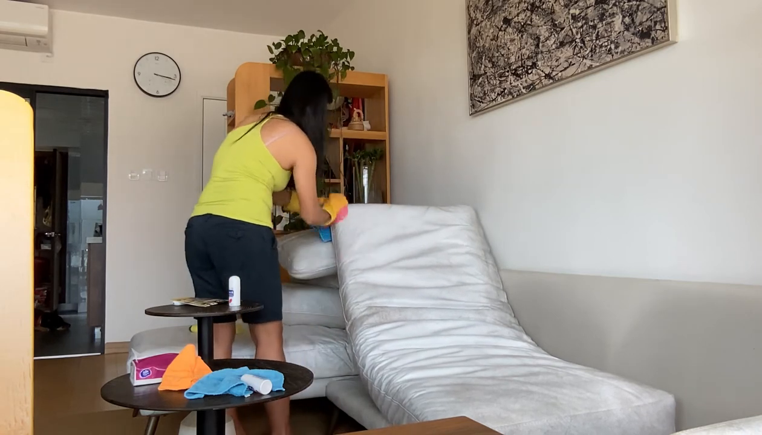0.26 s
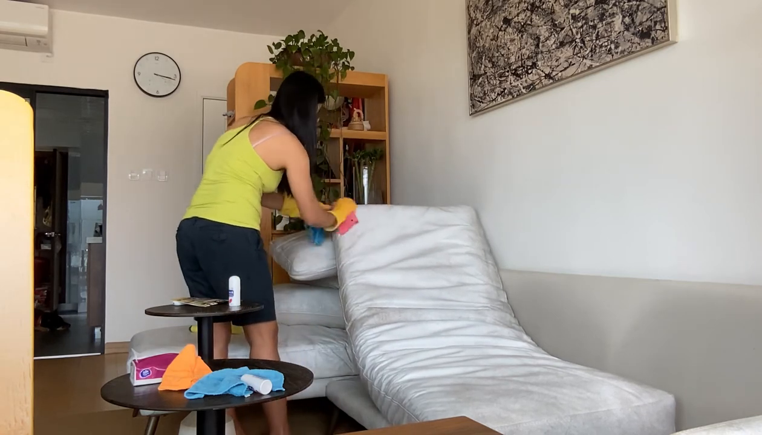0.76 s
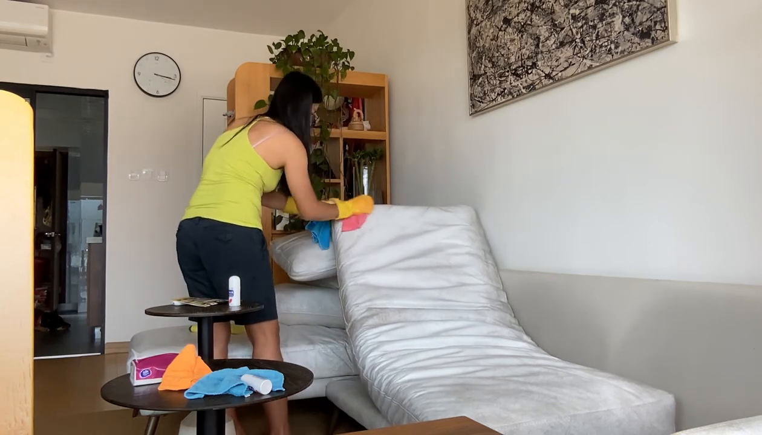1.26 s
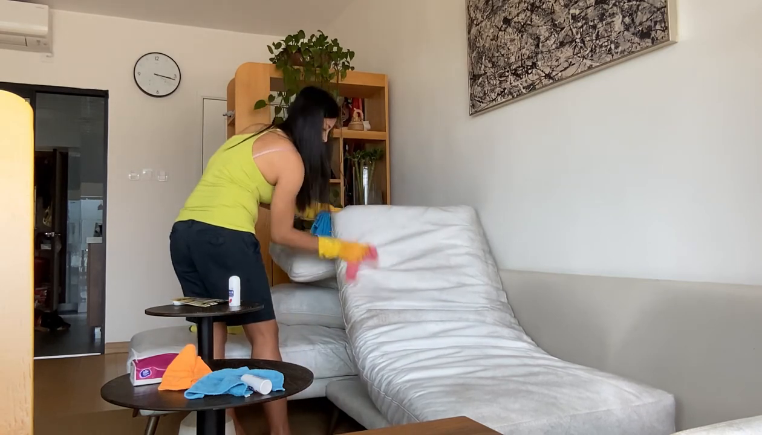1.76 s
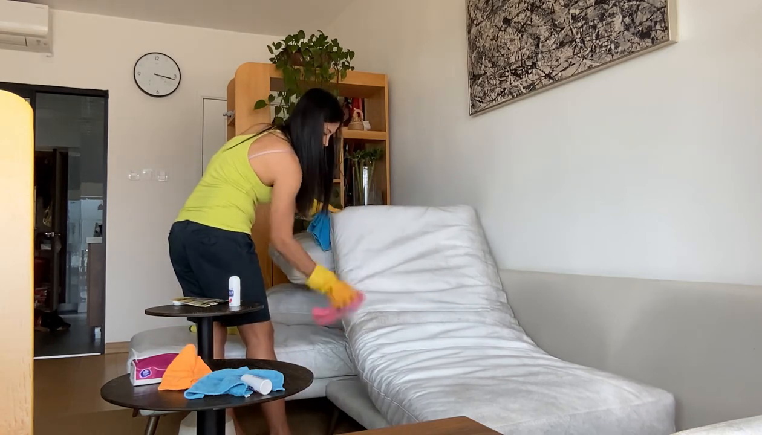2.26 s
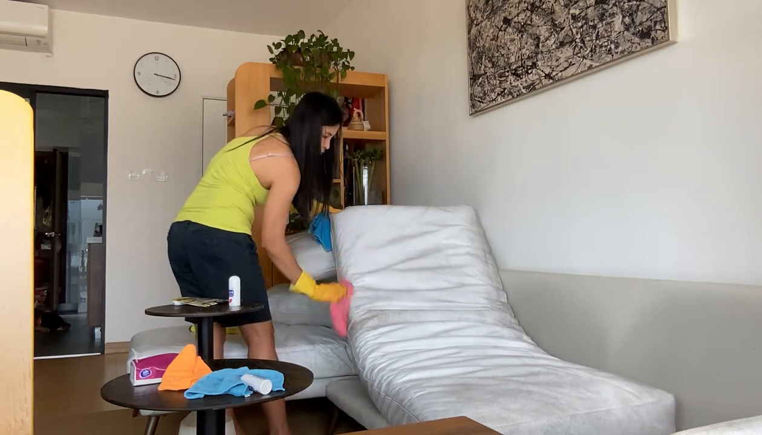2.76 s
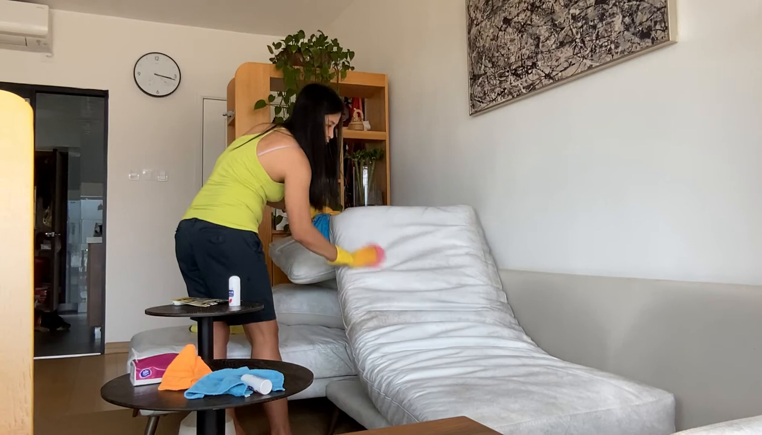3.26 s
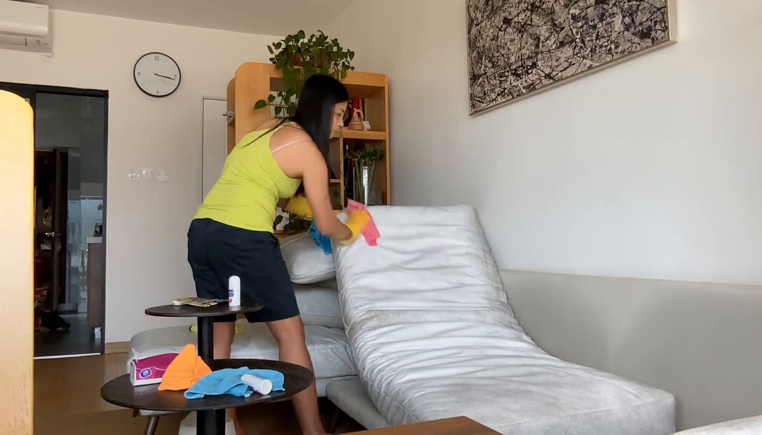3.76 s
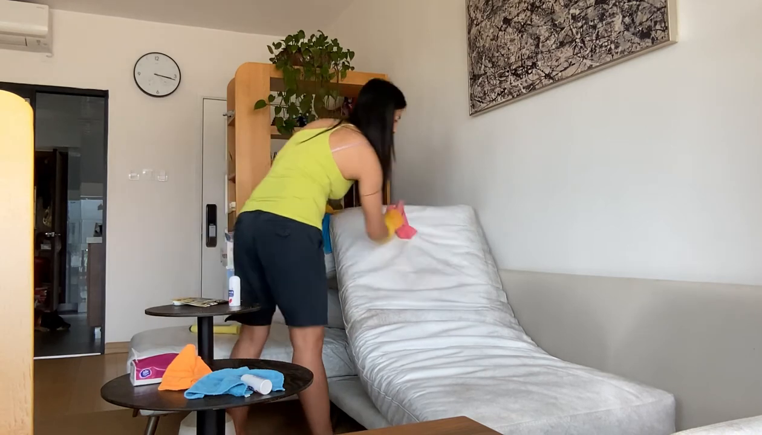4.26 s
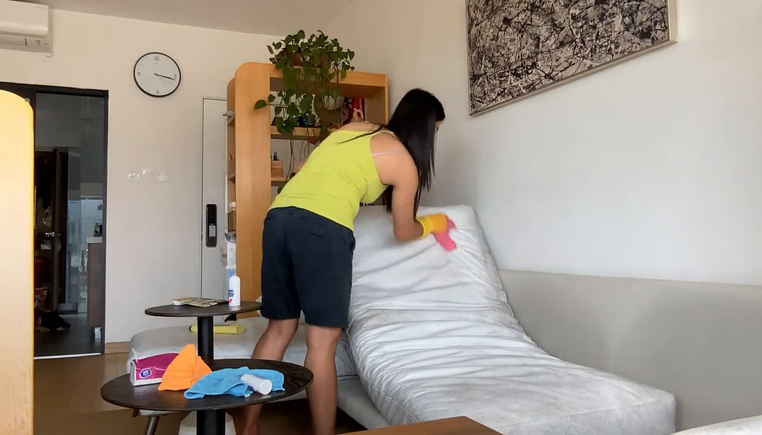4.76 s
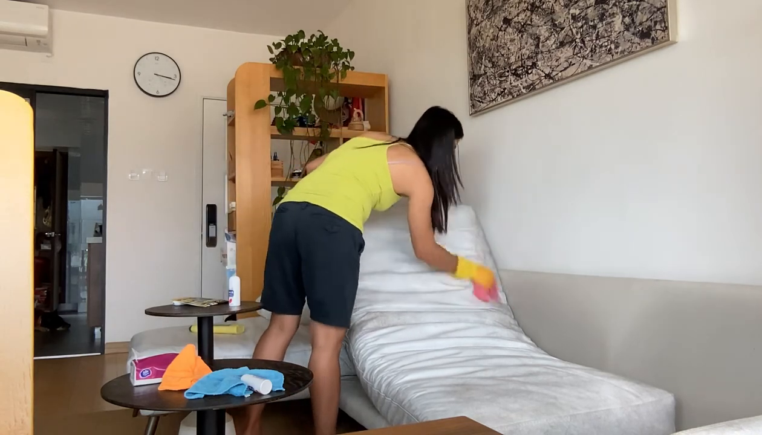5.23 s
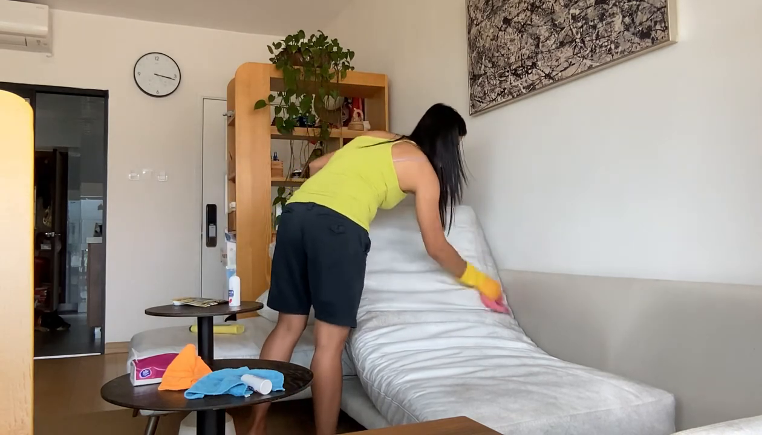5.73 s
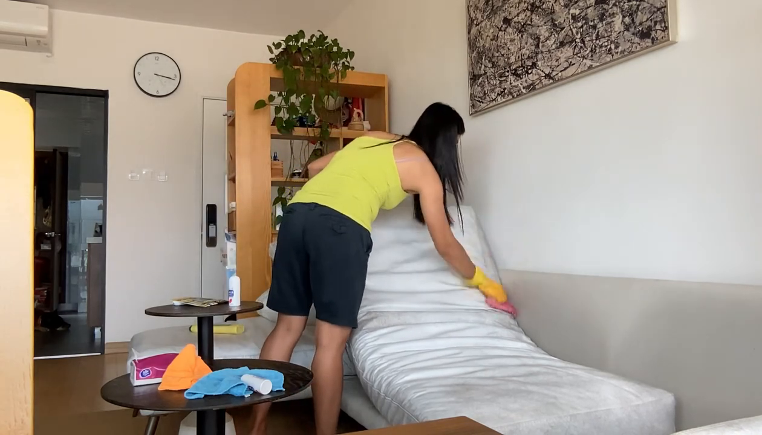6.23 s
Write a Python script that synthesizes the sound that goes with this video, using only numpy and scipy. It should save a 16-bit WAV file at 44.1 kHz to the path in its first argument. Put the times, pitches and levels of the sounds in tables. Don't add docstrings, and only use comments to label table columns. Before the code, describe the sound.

Fizzy, raspy scrubbing of upholstery, faint at first and then brisk and firm, drums the padded cushion lightly in a quietly humming room.

```python
import sys
import numpy as np
from scipy import signal
from scipy.fft import rfft, irfft, next_fast_len
from scipy.io import wavfile
from scipy.ndimage import uniform_filter1d, map_coordinates

SR = 44100
rng = np.random.default_rng(int(sys.argv[2]) if len(sys.argv) > 2 else 0)


def how_loud(loudness_db):
    steps = np.asarray(loudness_db, float) / 20
    return 10 ** steps


def wrap_up_sound(samples):
    columns = np.atleast_2d(samples).T
    tamed = np.clip(columns, -1, 1)
    steps = np.round(tamed * 32767).astype(np.int16)
    wavfile.write(sys.argv[1], SR, steps)


N = 286209

# f/Hz, density/dB
AIR_COLOUR = [(15, -52), (25, -53), (70, -6), (96, 16), (156, -17), (323, -16), (390, -3), (668, 0),
              (1030, -6.5), (1270, -14), (2570, -18), (6080, -34), (8860, -41), (12600, -15), (15600, -47)]
# f/Hz, width/Hz, level/dB
DRONE_MODES = [(68, 8, -5), (93, 13, 0), (405, 22, -14), (479, 12, -18)]
# f/Hz, t60/s
WALL_DECAY = [(150, 0.53), (1500, 1), (12000, 0.34)]

# f/Hz, width/Hz, level/dB
DRUM_MODE = [(198, 12, 0)]
# f/Hz, width/Hz, level/dB
COVER_LOW_MODES = [(238, 23, 0), (275.6, 23, -2), (310, 25.5, -2.5)]
# f/Hz, width/Hz, level/dB
COVER_HIGH_MODES = [(394.4, 44, 3), (432, 16, -2.5), (483, 25, -2.5), (544.6, 24.5, -2), (640, 160, -15)]
# f/Hz, width/Hz, level/dB
FOAM_MODES = [(112, 14, -3), (131, 14, 0), (154, 14, -4)]
# f/Hz, width/Hz, level/dB
FRAME_MODES = [(71, 8, -1), (97, 13, 0)]
# t/s, taut ring share/0-1
TAUTNESS = [
    (0, 0.37),
    (3.4, 0.34),
    (3.9, 1),
    (6.49, 1),
]
# t/s, half length/s, push/dB, slackness re push/dB, foam sinking re push/dB
WRINKLE_RIDES = [(0.155, 0.06, -59, 3, -3), (1.17, 0.046, -59, -8, -1), (1.58, 0.04, -43.5, -11, 1),
                 (1.777, 0.056, -52, 3, 4.5), (1.854, 0.036, -59.5, 9, 4), (2.132, 0.047, -47, -2, 1.5),
                 (2.32, 0.043, -50.5, 0, 4), (2.393, 0.052, -49, 3, 2), (2.986, 0.06, -47, -4.5, -1.5),
                 (3.326, 0.063, -49.5, -3, -4), (3.553, 0.057, -46.5, -4, 2.5),
                 (3.888, 0.042, -47.5, -4, 2.5), (4.144, 0.045, -45, -7, -1.5),
                 (4.447, 0.063, -49.5, -1.2, 5), (4.699, 0.052, -46, -4, 3.5),
                 (5.06, 0.057, -43.5, -1.5, 4.5), (5.293, 0.064, -43.5, 1, -6.5),
                 (5.588, 0.055, -39.5, -2, -10), (5.634, 0.037, -45.5, -1, 5), (5.78, 0.039, -44.5, 3.2, 2),
                 (5.874, 0.043, -47.5, -2.5, -6), (6.142, 0.056, -44, -2.5, 2.5), (6.27, 0.039, -58, 7, 9),
                 (6.37, 0.054, -43, -0.5, -12)]
# t/s, half length/s, push/dB
COVER_SKIPS = [(0.195, 0.02, -55), (1.62, 0.078, -50), (1.752, 0.037, -46.5), (1.847, 0.047, -46.5),
               (2.12, 0.038, -45), (2.33, 0.06, -48), (2.943, 0.032, -45.5), (3.02, 0.033, -44),
               (3.322, 0.044, -49), (3.557, 0.086, -53), (3.9, 0.053, -52.5), (4.12, 0.028, -37.5),
               (4.418, 0.04, -45), (4.634, 0.026, -40), (4.724, 0.034, -55), (5.042, 0.031, -30),
               (5.26, 0.038, -34.5), (5.57, 0.066, -43.5), (5.63, 0.03, -51), (5.752, 0.025, -48),
               (5.86, 0.04, -52.5), (6.075, 0.033, -41.5), (6.147, 0.045, -45.5), (6.298, 0.04, -47),
               (6.37, 0.04, -44)]
# lag/s, stretch/ratio, level between pushes/dB
TO_DRUM = (0.001, 0.97, -63.5)
TO_COVER_LOW = (0.017, 0.93, -62)
TO_COVER_HIGH = (0.001, 0.87, -58)
TO_FOAM = (0.019, 1.06, -62.5)

# turn t/s, fastest t/s, speed/dB, drag at turn/dB, pointedness/exponent
EDGE_WIPES = [(-0.1, 0.0, -51.5, -56, 0.9), (0.054, 0.133, -49, -62, 0.76), (0.282, 0.466, -48.5, -62, 1),
              (0.537, 0.593, -50.5, -58, 0.61), (0.775, 0.83, -54.5, -61, 0.7), (0.92, 0.99, -56, -65, 0.8),
              (1.056, 1.154, -51, -63.5, 1.7), (1.237, 1.32, -55.5, -61.5, 0.72)]
# turn t/s, fastest t/s, speed/dB, drag at turn/dB, pointedness/exponent
FIRM_STROKES = [(1.414, 1.6, -42.5, -57.5, 1.6), (1.66, 1.758, -43.5, -56.5, 1.2),
                (1.934, 2.08, -44, -62.5, 0.94), (2.223, 2.31, -49.5, -57.2, 1.2),
                (2.54, 2.69, -51.5, -59.5, 0.67), (2.89, 3, -44.5, -63, 0.71),
                (3.152, 3.27, -42.5, -59, 0.87), (3.42, 3.542, -43.5, -58, 0.51),
                (3.715, 3.89, -43.5, -61, 0.97), (4.017, 4.09, -38.5, -55, 1.4),
                (4.28, 4.443, -43.5, -57.5, 0.98), (4.545, 4.68, -40.5, -57, 0.94),
                (4.846, 5.05, -41, -57.5, 1.03), (5.155, 5.265, -44, -56, 0.7),
                (5.423, 5.562, -41, -60, 1.16), (5.712, 5.825, -44, -56.5, 0.88),
                (5.968, 6.11, -43, -60, 0.93), (6.233, 6.346, -42, -54.5, 1.2), (6.49, 6.6, -45, -58, 1)]
# t/s, half length/s, pressure/dB, coarseness/dB
HAND_BITES = [(0.0, 0.05, -60, -1), (0.163, 0.076, -60.5, 6.5), (0.44, 0.075, -54.5, -6),
              (0.63, 0.045, -52.5, -7), (0.814, 0.021, -56, 1.5), (1.153, 0.048, -56.5, -4),
              (1.326, 0.08, -63.5, 4), (1.525, 0.057, -51.5, -23), (1.592, 0.028, -49.5, 3.5),
              (1.784, 0.066, -53, 4), (2.103, 0.067, -51, 2), (2.32, 0.046, -54, 5),
              (2.388, 0.072, -53, 3.5), (2.771, 0.036, -55.5, 3.2), (2.887, 0.038, -63.5, 13),
              (2.972, 0.043, -54.5, 6.5), (3.04, 0.044, -53, -1.5), (3.31, 0.075, -53, 1.5),
              (3.558, 0.064, -52.5, 2.8), (3.91, 0.057, -54.5, 1), (4.15, 0.06, -53.5, 4),
              (4.447, 0.06, -51.5, 3), (4.69, 0.059, -50, 3.5), (5.042, 0.046, -45.5, 2.5),
              (5.296, 0.056, -50, 2), (5.59, 0.061, -48.5, 2), (5.84, 0.062, -48.5, 0.7),
              (6.065, 0.044, -49, -3), (6.129, 0.04, -46, 2), (6.358, 0.055, -50, 1.2),
              (0.36, 0.045, -59, -3), (0.7, 0.05, -65, 1), (0.947, 0.1, -63.5, 3), (2.55, 0.05, -64, 5.5),
              (2.666, 0.07, -59, 3.5), (4.24, 0.05, -61, 0)]
# re speed/dB, re turn drag/dB, lag/s, sharpening/ratio, re pressure/dB
FIZZ_FOLLOW = (-0.3, -0.3, 0.0, 0.95, -15)
HISS_FOLLOW = (-10.5, -5.5, 0.03, 1.48, -4.5)
RASP_FOLLOW = (-15.5, 0.6, -0.3, 1.3, -0.66)
SCRATCH_FOLLOW = (-15, -5.5, 0, 3, -0.3)
# f/Hz, width/Hz, level/dB
PORT_MODES = [(12260, 1760, -4), (11100, 3700, -11)]
# f/Hz, density/dB
HISS_COLOUR = [(1760, -21), (3000, -5), (4650, 0), (6070, -2.5), (6960, -0.5), (8010, -3), (10000, -3),
               (13000, -19), (22000, -120)]
# f/Hz, density/dB
RASP_COLOUR = [(380, -24), (650, -2.5), (836, -3.5), (906, -2.5), (1030, -2.5), (1900, -6.5), (2470, -13),
               (4180, -120)]
# f/Hz, density/dB
SCRATCH_COLOUR = [(1000, -11.5), (1700, -5.5), (2600, -1), (3030, -5), (3700, -7), (4810, -13),
                  (8140, -120)]
# t/s, peak/dB
SEAM_SNAGS = [(0.79, -46), (1.7784, -39), (2.506, -45), (2.852, -47), (3.5555, -37), (3.7773, -45),
              (4.673, -36), (5.0, -34), (5.1731, -45), (5.7319, -46), (5.7634, -41), (6.111, -30)]


def unit(x):
    return x / np.sqrt(np.mean(x ** 2) + 1e-20)


def along(points, f_hz):
    f, value = np.transpose(points)
    return np.interp(np.log(f_hz + 1), np.log(f + 1), value)


def curves(rows):
    t_s, *columns = np.transpose(rows)
    return [np.interp(np.arange(N) / SR, t_s, column) for column in columns]


def wobble(rate_hz):
    knots = rng.standard_normal(int(N * rate_hz / SR) + 4)
    return map_coordinates(knots, [np.arange(N) * rate_hz / SR])


def filtered(x, response):
    m = next_fast_len(N + SR // 2)
    spectrum = rfft(x, m) * response(np.fft.rfftfreq(m, 1 / SR))
    return unit(irfft(spectrum, m)[:N])


def coloured(x, colour):
    return filtered(x, lambda f_hz: how_loud(along(colour, f_hz)))


def resonant(x, modes):
    def response(f):
        return sum(how_loud(db) * 1j * f * w / (c * c - f * f + 1j * f * w) for c, w, db in modes)
    return filtered(x, response)


def friction(grip_db, patchy_db):
    slips = signal.stft(rng.standard_normal(N), nperseg=256)[2]
    patches = uniform_filter1d(rng.standard_normal(slips.shape), 5, 0)
    patches = unit(uniform_filter1d(patches, 12, 1))
    return how_loud(grip_db) * signal.istft(slips * how_loud(patchy_db * patches), nperseg=256)[1][:N]


def pushes(t_s, half_s, push_db, lag_s=0, stretch=1, rest_db=-120):
    t = np.arange(0, N + 64, 64) / SR
    bells = np.exp(-((t - lag_s - t_s[:, None]) / (stretch * half_s[:, None])) ** 2)
    power = how_loud(rest_db) ** 2 + how_loud(push_db) ** 2 @ bells
    return np.interp(np.arange(N) / SR, t, 10 * np.log10(power))


def driven(level_db, jolt_db, modes, skirt):
    push = how_loud(level_db) * friction(jolt_db, patchy_db=-0.25)
    ring = resonant(resonant(push, modes), [skirt])
    return ring * np.sqrt(np.mean(how_loud(level_db) ** 2))


def strokes(speed_offset_db, turn_offset_db, lag_s, sharpen, press_offset_db, coarse):
    turn_s, fastest_s, speed_db, drag_db, pointed = np.transpose(EDGE_WIPES + FIRM_STROKES)
    t = np.arange(0, N + 64, 64) / SR
    next_turn_s = np.append(turn_s[1:], np.inf)
    peak_s = np.clip(fastest_s + lag_s, turn_s + 0.01, next_turn_s - 0.01)
    phase = np.interp(t, np.ravel([turn_s, peak_s], order="F"), np.arange(2 * len(turn_s)) / 2)
    stroke = phase.astype(int)
    top = how_loud(speed_db + speed_offset_db)[stroke]
    rest = how_loud(drag_db + turn_offset_db)[np.round(phase).astype(int)]
    speed = np.abs(np.sin(np.pi * phase)) ** np.abs(sharpen * pointed[stroke])
    glide = rest + (top - rest) * speed
    press_s, half_s, press_db, coarse_db = np.transpose(HAND_BITES)
    bite = how_loud(pushes(press_s, half_s, press_db + press_offset_db + coarse * coarse_db))
    return np.hypot(np.interp(np.arange(N) / SR, t, glide), bite)


def room_tone():
    air = coloured(rng.standard_normal(N), AIR_COLOUR)
    drone = resonant(resonant(rng.standard_normal(N), DRONE_MODES), [(113, 190, 0)])
    air_db = -58.5 + 0.29 * wobble(1.8)
    drone_db = -53.5 + 1.8 * wobble(2.07)
    return how_loud(air_db) * air + how_loud(drone_db) * drone


def walls(x):
    f_hz, t_s, z = signal.stft(rng.standard_normal(SR // 2), SR, nperseg=256)
    decay_db = -60 * t_s / along(WALL_DECAY, f_hz)[:, None]
    tail = signal.istft(z * how_loud(decay_db), SR, nperseg=256)[1]
    delayed = np.pad(x, (500, 0))
    return signal.fftconvolve(delayed, tail / np.linalg.norm(tail))[:N]


def cushion():
    t_s, half_s, push_db, slack_db, sink_db = np.transpose(WRINKLE_RIDES)
    drum_db = pushes(*np.transpose(COVER_SKIPS), *TO_DRUM)
    low_db = pushes(t_s, half_s, push_db + slack_db, *TO_COVER_LOW)
    high_db = pushes(t_s, half_s, push_db, *TO_COVER_HIGH)
    thud_db = pushes(t_s, half_s, push_db + sink_db, *TO_FOAM)
    jolts = wobble(45)
    share = np.clip(curves(TAUTNESS)[0], 0.02, 0.98)
    taut = driven(drum_db + 10 * np.log10(share), 2.2 * jolts, DRUM_MODE, (198, 60, 0))
    slack = driven(drum_db + 10 * np.log10(1 - share), 0.83 * jolts, [(198, 44, 0)], (200, 90, 0))
    low = driven(low_db - 0.1, 1.6 * jolts, COVER_LOW_MODES, (290, 150, 0))
    high = driven(high_db - 0.1, 2.06 * jolts, COVER_HIGH_MODES, (500, 350, 0))
    thud = driven(thud_db - 0.1, 0.86 * jolts, FOAM_MODES, (132, 65, 0))
    lean_db = uniform_filter1d(np.maximum(thud_db, high_db), SR // 12)
    boom = driven(-50 + 0.8 * (lean_db + 48), 0.57 * jolts, FRAME_MODES, (85, 60, 0))
    return taut + slack + low + high + thud + boom


def seam_snags():
    snaps = np.zeros(N + SR)
    t = np.arange(SR // 20) / SR
    t60_s = 0.026
    for t_s, peak_db in SEAM_SNAGS:
        envelope = how_loud(peak_db - 8.5 - 60 * t / t60_s)
        snaps[round(t_s * SR):][:len(t)] += envelope * rng.standard_normal(len(t))
    band = signal.butter(2, [800, 5500], "band", fs=SR, output="sos")
    return signal.sosfilt(band, snaps[:N])


def sponge():
    grip, grain = wobble(25), wobble(180)
    fizz = resonant(friction(0.49 * grip + 0.48 * grain, patchy_db=1.1), PORT_MODES)
    fizz = coloured(fizz, [(6000, -21), (9000, -5), (13000, 2.5), (15700, -7)])
    hiss = coloured(friction(0.82 * grip + 0.35 * grain, patchy_db=0.9), HISS_COLOUR)
    rasp = coloured(friction(0.92 * grip + 1.35 * grain, patchy_db=1.5), RASP_COLOUR)
    scratch = coloured(friction(0.54 * grip + 0.51 * grain, patchy_db=1.5), SCRATCH_COLOUR)
    rub = strokes(*FIZZ_FOLLOW, coarse=False) * fizz
    rub += strokes(*HISS_FOLLOW, coarse=False) * hiss
    rub += strokes(*RASP_FOLLOW, coarse=True) * rasp
    rub += strokes(*SCRATCH_FOLLOW, coarse=False) * scratch
    return how_loud(-0.91) * rub + 2.3 * seam_snags()


def scene():
    sofa = sponge() + cushion()
    return (sofa + how_loud(-14.0) * walls(sofa) + room_tone())[None]


def low_pass(x):
    return signal.sosfilt(signal.butter(12, 15750, fs=SR, output="sos"), x)


def record(dry):
    low_cut = signal.butter(5, 60, "high", fs=SR, output="sos")
    rumble = coloured(rng.standard_normal(N), [(15, -7), (25, 10), (50, 13), (80, -22), (200, -80)])
    mix = signal.sosfilt(low_cut, dry) + how_loud(-99) * rumble
    return low_pass(mix)


dry = scene()
out = record(dry)
wrap_up_sound(out)
```